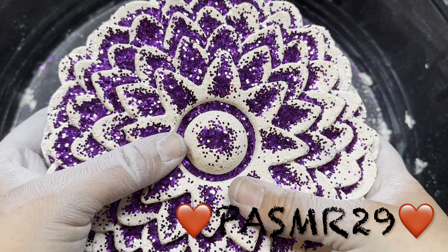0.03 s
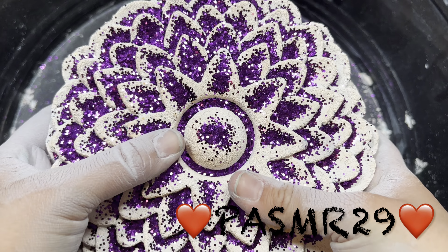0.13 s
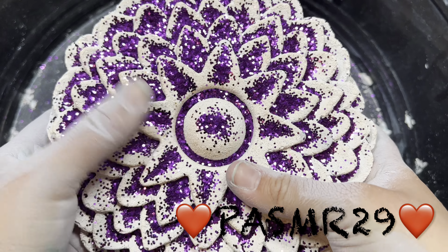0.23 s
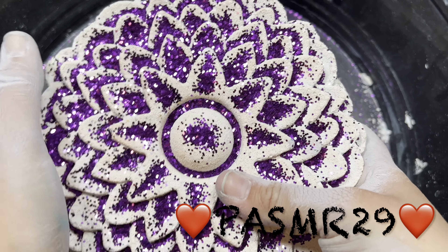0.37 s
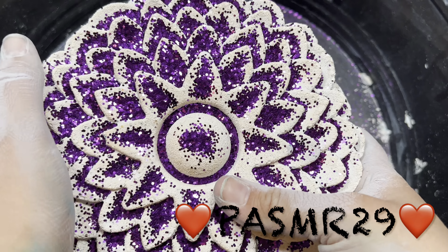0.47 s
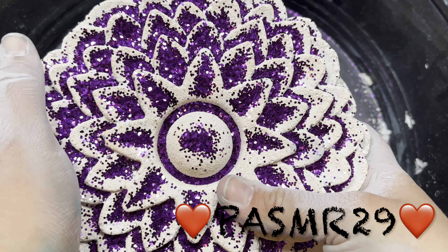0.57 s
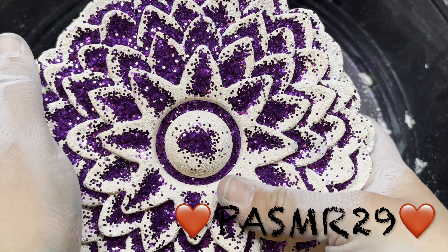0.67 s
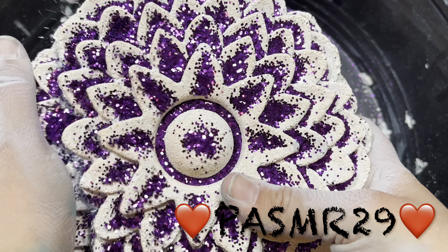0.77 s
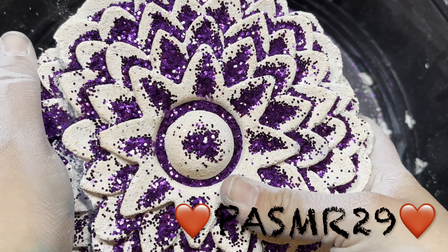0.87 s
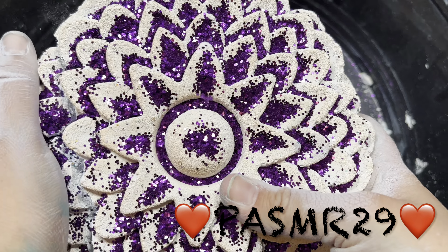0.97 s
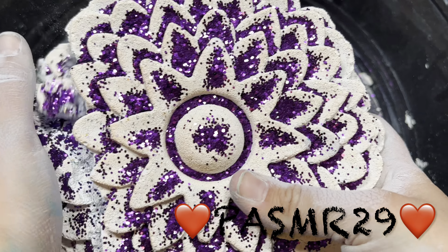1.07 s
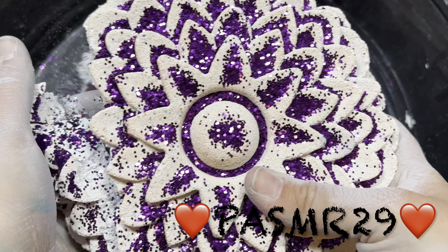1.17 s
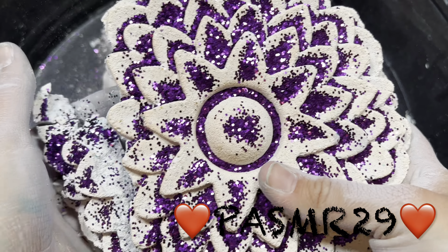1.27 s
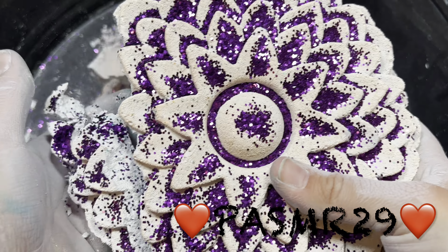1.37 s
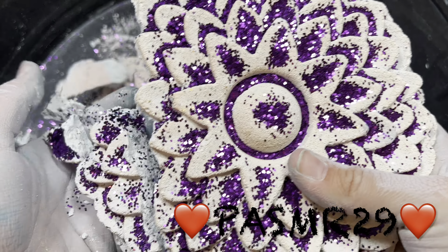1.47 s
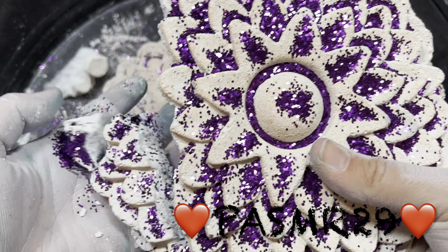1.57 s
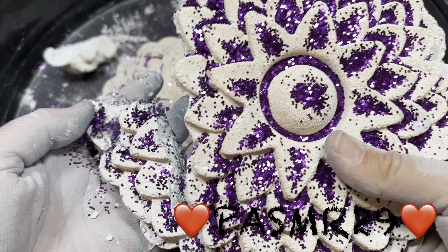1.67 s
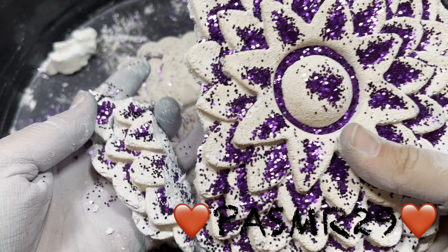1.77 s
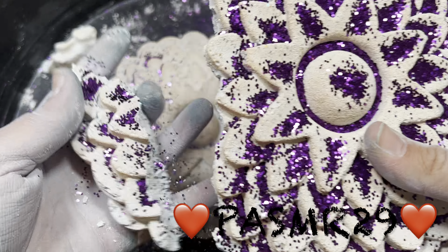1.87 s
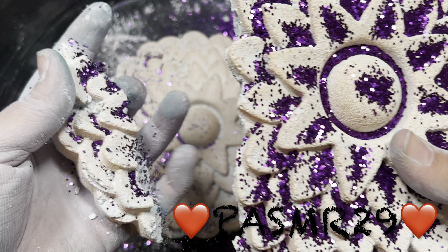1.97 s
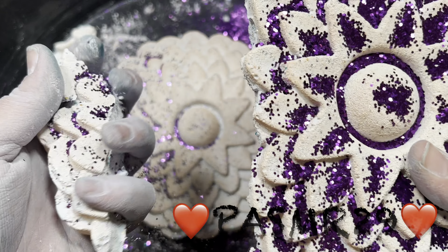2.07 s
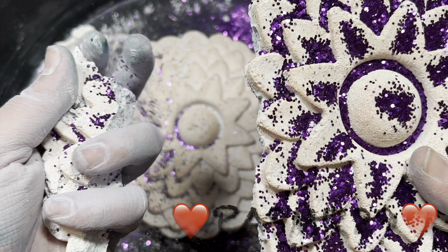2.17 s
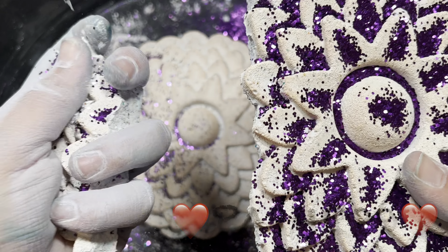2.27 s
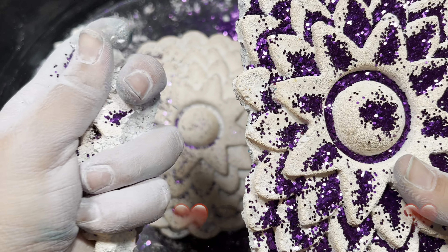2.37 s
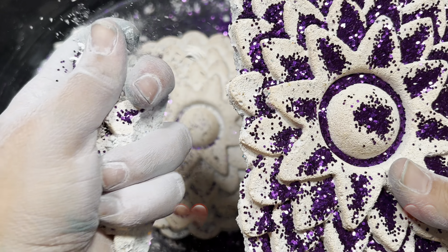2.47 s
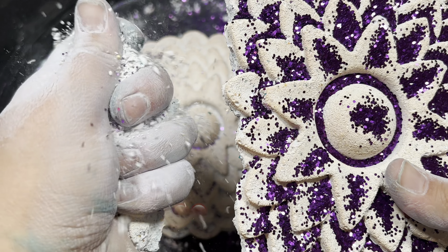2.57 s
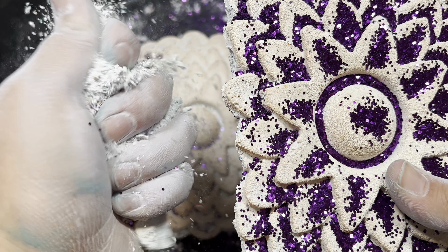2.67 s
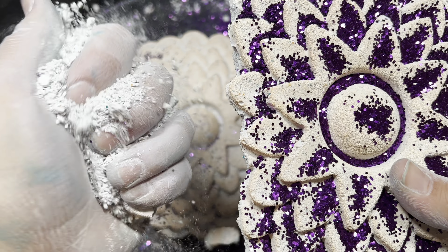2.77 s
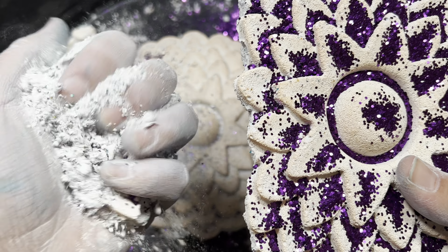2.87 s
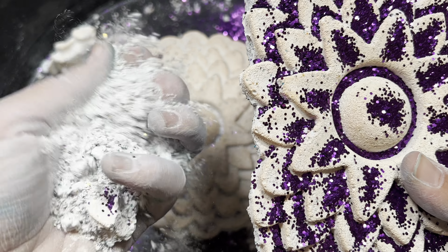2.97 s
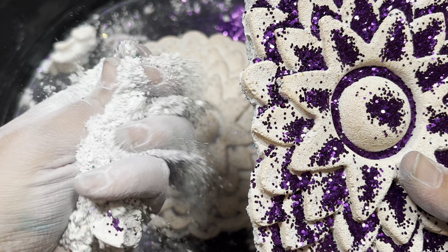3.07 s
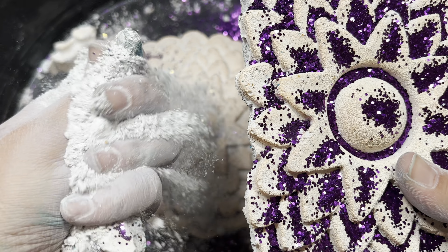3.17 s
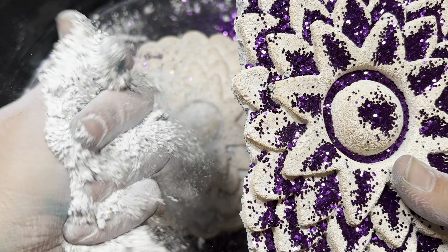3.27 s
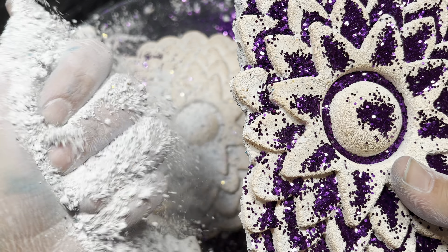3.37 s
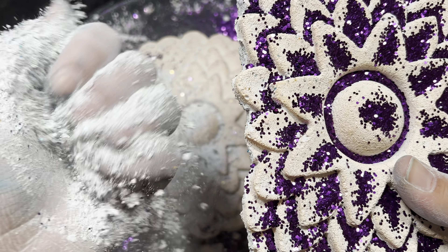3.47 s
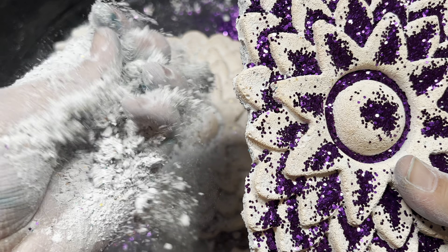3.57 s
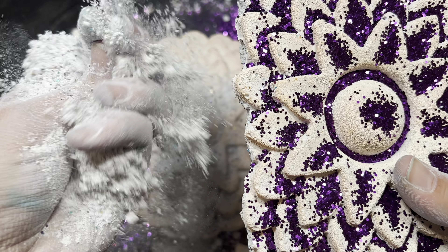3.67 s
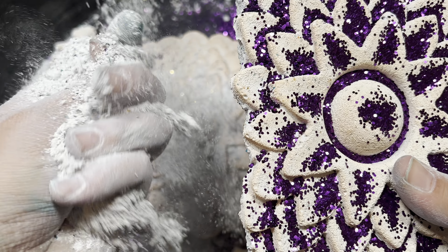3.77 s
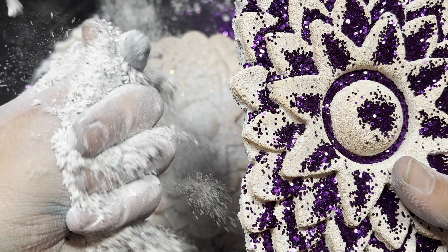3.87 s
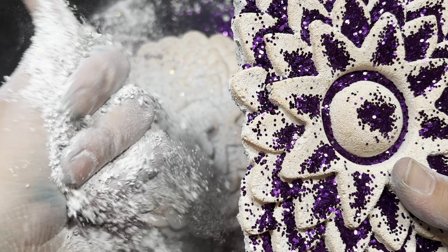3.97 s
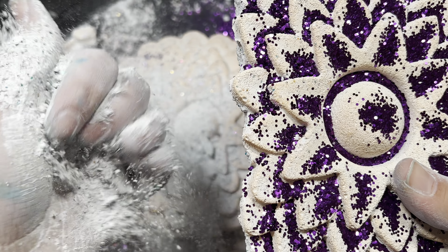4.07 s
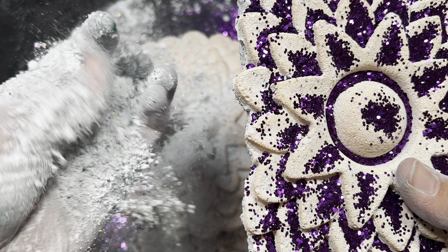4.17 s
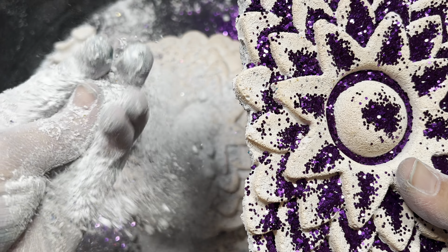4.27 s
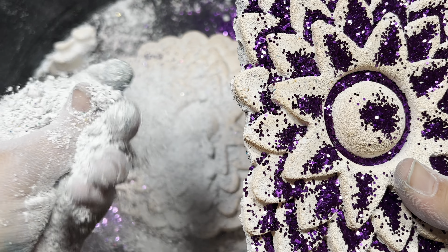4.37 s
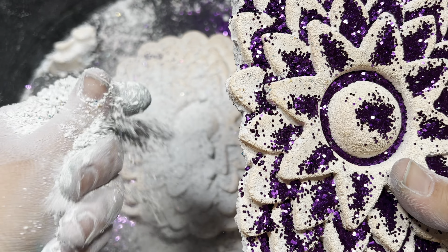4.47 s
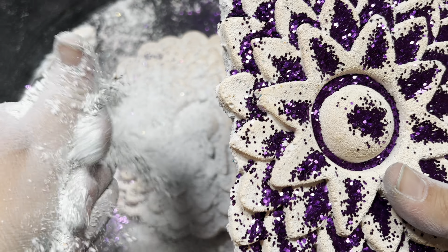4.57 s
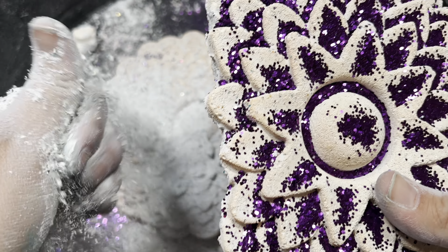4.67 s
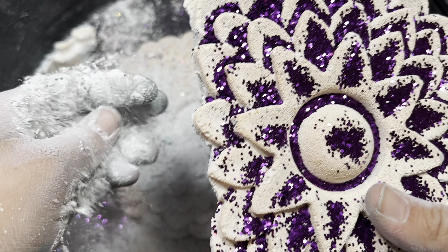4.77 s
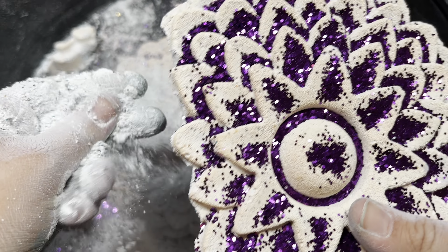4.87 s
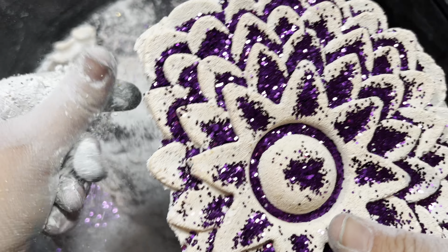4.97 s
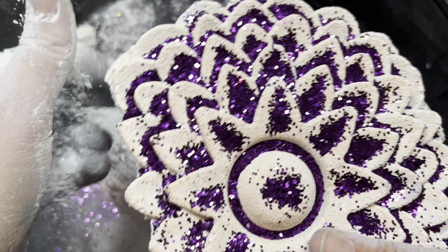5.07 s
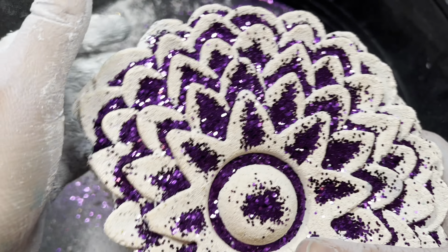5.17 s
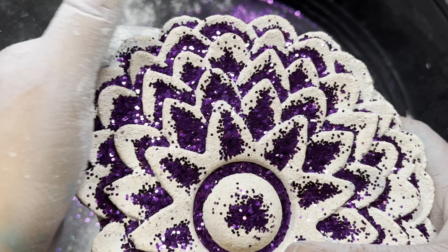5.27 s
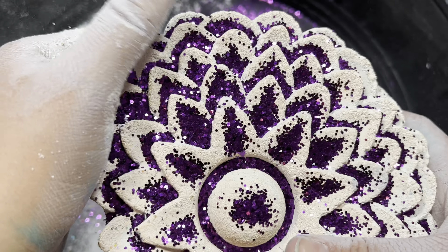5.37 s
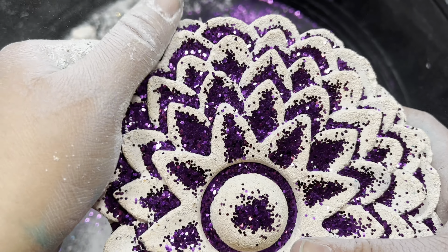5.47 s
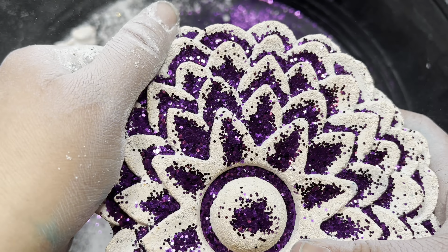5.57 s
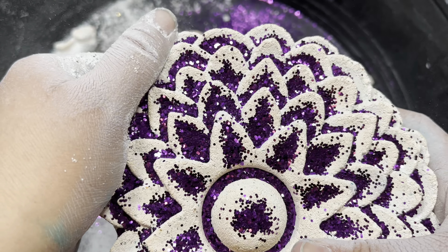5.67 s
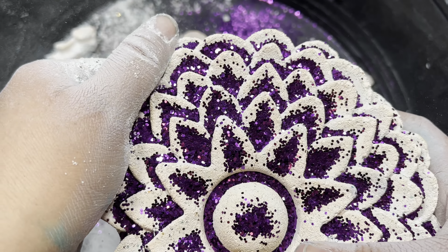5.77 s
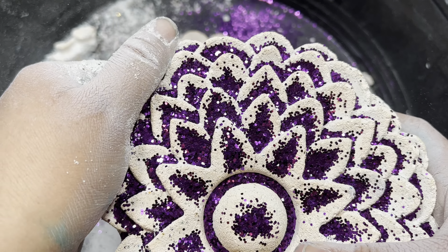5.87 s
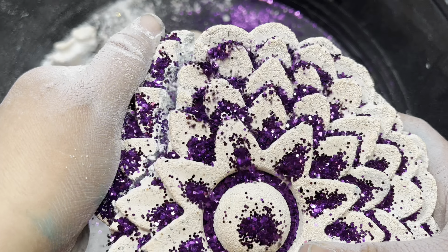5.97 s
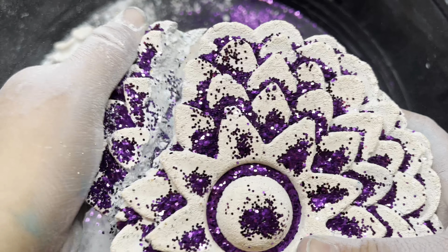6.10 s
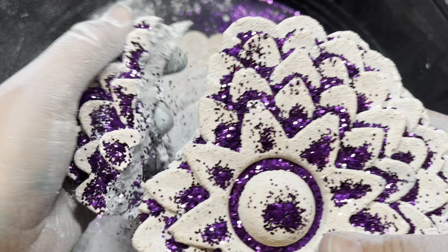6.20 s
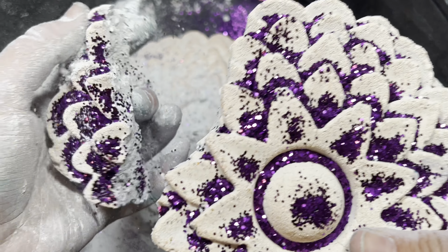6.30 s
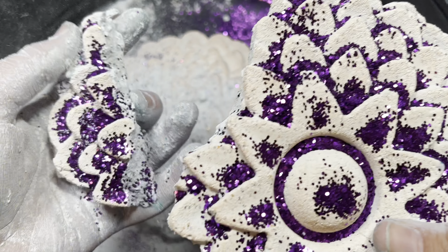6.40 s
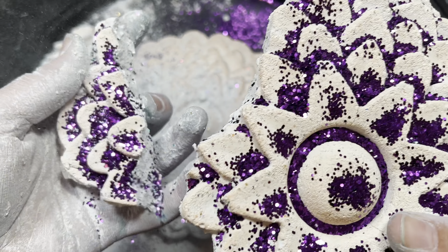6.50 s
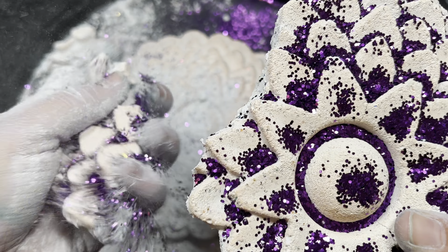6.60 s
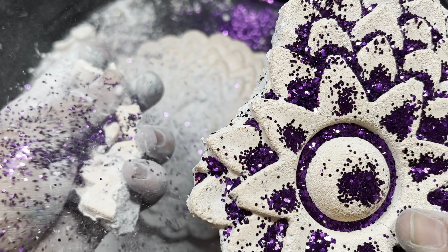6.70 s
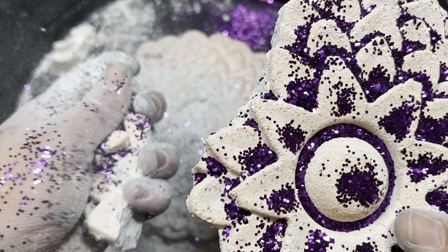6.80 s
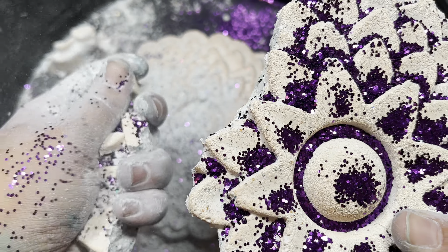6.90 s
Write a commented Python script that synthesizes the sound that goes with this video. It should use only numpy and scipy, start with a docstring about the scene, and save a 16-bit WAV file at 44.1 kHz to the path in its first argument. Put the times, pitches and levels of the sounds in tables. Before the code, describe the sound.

Brittle chalk cracks and crumbles between fingers, hissing powder trickling down and chunks drumming hollowly on a plastic tub.

```python
"""At a plastic tub, stereo phone microphone close in: hands snap pieces off a chalk block and crush them.
Fingers rasp over the chalk, powder rubs and trickles, and the chalk cracks in gritty bursts.
Falling lumps drum on the tub, whose ring shortens as powder fills it; the stand thuds beneath it,
and chips clink on a whole block lying inside. A low hum wavers underneath; the loudest blows clip."""
import sys
import numpy as np
from scipy import signal
from scipy.fft import rfft, irfft, next_fast_len
from scipy.io import wavfile
from scipy.ndimage import uniform_filter1d, map_coordinates

SR = 44100
rng = np.random.default_rng(int(sys.argv[2]) if len(sys.argv) > 2 else 0)


def unload_audio(sound):
    """Save the sound as a 16-bit wav file, at the path given as the first command line argument."""
    columns = np.transpose(np.atleast_2d(sound))
    # keep every value between -1 and 1, then stretch to whole-number steps
    steps = np.round(np.clip(columns, -1, 1) * 32767)
    wavfile.write(sys.argv[1], SR, steps.astype(np.int16))


N = 306054

# spectrum of the background hum: (f/Hz, level/dB)
HUM_SPECTRUM = [(36, -31.5), (49, 4), (70, 4), (86, -8.5), (200, -15), (260, -45.5)]
# fingers sliding over chalk and grinding it: (middle t/s, length/s, level/dB, centre f/Hz)
STROKES = [(0.035, 0.04, -54.5, 2400), (0.22, 0.14, -45.5, 2290), (0.403, 0.24, -48, 2670),
           (0.596, 0.03, -48, 5000), (0.984, 0.1, -41.5, 3030), (1.276, 0.087, -38, 9000),
           (2.049, 0.086, -36, 7000), (2.376, 0.025, -35.5, 6050), (2.631, 0.037, -27.5, 9400),
           (2.937, 0.029, -32, 3100), (3.27, 0.25, -35.5, 7900), (4.138, 0.055, -35, 6560),
           (4.424, 0.05, -38.5, 6000), (4.564, 0.055, -31, 5400), (4.683, 0.063, -38.5, 1500),
           (4.73, 0.063, -32.5, 6860), (4.871, 0.1, -36.5, 2260), (4.941, 0.067, -35, 7500),
           (5.255, 0.071, -35, 6950), (5.432, 0.057, -42.5, 9900), (6.195, 0.34, -48, 5200),
           (6.414, 0.063, -34.5, 6550), (6.554, 0.05, -32, 6070), (6.597, 0.034, -22.5, 6600),
           (6.807, 0.039, -31, 4600)]
# resonances of skin dragged over chalk: (f/Hz, width/Hz, level/dB)
RASP_BANDS = [(2060, 130, 0), (2420, 140, 2.5), (4300, 500, -3), (6000, 380, 3.5)]
# rubbing and trickling powder: (t/s, hiss level/dB, rub level/dB)
POWDER_FLOW = [(.13, -70, -65.5), (.2, -43, -60.5), (.5, -49.5, -61), (.7, -77, -66), (.79, -50.5, -59.5),
               (1.44, -48, -56.5), (1.599, -39, -44.5), (1.901, -40.5, -54.5), (2.459, -43, -56),
               (2.7, -35, -44.5), (3.77, -38, -44.5), (3.851, -33.5, -36), (4.151, -41, -44),
               (4.2, -49, -54.5), (4.279, -42, -46.5), (4.74, -42, -49.5), (4.78, -46, -48.5),
               (4.99, -38, -57.5), (5.061, -55, -56.5), (5.45, -46.5, -57.5), (5.55, -65.5, -71),
               (5.87, -67.5, -66), (5.947, -36.5, -49.5), (6.049, -60.5, -75), (6.501, -46, -56.5),
               (6.94, -40.5, -45)]
# spectra of fine grit and of coarse crumbs rubbing: (f/Hz, level/dB)
GRIT_SPECTRUM = [(1470, -32.5), (2500, -18.5), (2940, -16), (7650, -13), (12200, -18), (15000, -17.5),
                 (16000, -18.5)]
RUB_SPECTRUM = [(260, 8), (450, -17), (535, -23), (724, -4.5), (853, -5), (1680, -11.5), (2000, -6),
                (4000, -16), (6000, -38.5)]
# cracks in the chalk: (t/s, level/dB, centre f/Hz)
SNAPS = [(0.644, -53, 3000), (0.7487, -20, 7950), (0.9162, -36, 2730), (0.931, -27, 2620),
         (0.965, -29.5, 2510), (0.992, -26.5, 3140), (1.1796, -27, 3350), (1.2287, -17, 10900),
         (1.359, -40.5, 3170), (1.487, -36, 8120), (1.504, -20, 6550), (1.608, -29, 7900),
         (1.631, -34, 5100), (2.005, -40, 4460), (2.0256, -23.5, 5370), (2.059, -32.5, 7500),
         (2.211, -32, 6550), (2.223, -27.5, 10900), (2.484, -31, 3080), (2.4972, -20.5, 3360),
         (2.525, -23.5, 5830), (2.578, -33, 2980), (2.671, -27, 8500), (2.734, -31, 6820),
         (2.781, -38, 6000), (2.797, -26.5, 9000), (2.8646, -19, 3580), (2.924, -19.5, 8000),
         (2.949, -43, 7280), (3.066, -25, 7200), (3.144, -29, 5100), (3.181, -21, 10700),
         (3.3257, -17.5, 4900), (3.344, -27, 6000), (3.4495, -16.5, 2500), (3.5462, -25, 11100),
         (4.0092, -22.5, 2440), (4.685, -34, 6000), (4.914, -38.5, 5900), (5.047, -39, 7840),
         (5.094, -44.5, 6850), (5.194, -37, 5800), (5.242, -37, 6060), (5.2977, -36, 2800),
         (5.38, -48, 5000), (5.447, -38, 9980), (5.576, -35.5, 3990), (5.7273, -44, 9920),
         (5.895, -18, 3800), (5.976, -31.5, 11350), (6.123, -43.5, 5430), (6.267, -43, 9940),
         (6.337, -40, 5140), (6.379, -27.5, 3400), (6.478, -47, 6000), (6.646, -30, 7850),
         (6.664, -17, 2640), (6.7417, -23, 2900), (6.818, -18.5, 4520)]
# lumps landing in the tub: (t/s, knock level/dB, knock centre f/Hz, boom level/dB, boom centre f/Hz)
LANDINGS = [(0.754, -15, 1700, -20.5, 357), (0.92, -23.5, 2170, -30.5, 304), (0.99, -23, 1085, -39.5, 371),
            (1.231, -11.5, 1510, -4.5, 200), (1.245, -11.5, 688, -6, 201.7),
            (1.456, -35.5, 647, -23.5, 177.4), (1.508, -9.5, 685, 4.5, 234), (1.565, -25, 742, -2, 187),
            (1.6085, -7.5, 1100, -12.5, 190), (1.696, -9, 707, 1, 335), (1.747, -6, 690, -3.5, 334),
            (1.81, -8, 901, -8, 315), (1.855, -26.5, 724, -16.5, 358), (2.209, -31.5, 1032, -28, 284.5),
            (2.501, -22.5, 915, -22.5, 307), (2.832, -29, 918, -41.5, 300.5), (2.8659, 7.5, 1964, 0, 278.7),
            (2.93, -11.5, 712, -14.5, 197), (2.953, -18, 757, -18, 280.4),
            (2.983, -5.5, 1100, -12.5, 392.6), (3.062, -22, 1197, -20.5, 350),
            (3.071, -13, 1000, -12.5, 402), (3.227, -20, 1610, -36, 361), (3.249, -28, 696, -25, 252.4),
            (3.326, -11, 1382, -21.5, 237), (3.369, -11.5, 1000, -10.5, 312),
            (3.431, -13, 1600, -15, 299.8), (3.452, 3, 900, 5.5, 232.7), (3.475, -29.5, 967, 3.5, 202.5),
            (3.509, -28, 594, -2.5, 277), (3.538, -22, 865, -27, 230.5), (3.574, -19, 900, -13.5, 210.7),
            (3.59, -18, 900, -18.5, 300), (3.649, -23, 1353, -20.5, 200.4), (3.689, -15.5, 1385, -24, 264),
            (3.826, -17, 693, -13.5, 223), (3.896, -23.5, 1288, -26, 207), (3.925, -33, 995, -23, 295.6),
            (3.982, -23, 660, -19, 243), (4.07, -29.5, 691, -25, 204), (4.661, -23, 970, -29.5, 336),
            (5.299, -32.5, 1557, -31.5, 416), (5.578, -35.5, 1810, -38.5, 348.5),
            (5.896, -16, 2110, -14.5, 297), (6.664, -11, 961, -26.5, 355.6), (6.743, -20, 1225, -37, 378),
            (6.821, -18, 2370, -27, 262)]
# low and high modes of the tub: (f/Hz, level/dB, t60/s)
BOOM_MODES = [(195.1, -2.5, 0.29), (234.9, -3.5, 0.2), (290.4, -1, 0.15), (327.8, 2, 0.075),
              (379, -0.5, 0.15)]
KNOCK_MODES = [(703, -2.5, 0.11), (776, 0, 0.051), (993, -3, 0.052), (1111, 1.5, 0.027), (1380, 2.5, 0.024),
               (2064, 1.5, 0.013), (2014, -3.5, 0.05), (2360, -3, 0.05), (3070, -11.5, 0.014)]
# thuds of the stand under the tub: (t/s, level/dB)
STAND_THUDS = [(0.76, -26), (1.245, -11.5), (1.509, -24), (1.736, -25.5), (2.498, -43), (2.864, -20.5),
               (3.453, -11.5), (5.894, -22), (6.605, -33)]
# chips striking the block in the tub: (t/s, level/dB, centre f/Hz)
CHIP_HITS = [(1.247, -16.5, 670), (1.609, -12, 886), (2.027, -27.5, 1520), (2.079, -36, 1350),
             (2.932, -17, 720), (3.575, -20.5, 700), (3.651, -12.5, 1121), (4.036, -29.5, 1360),
             (4.572, -28.5, 1360)]
# modes of that block: (f/Hz, level/dB, t60/s)
BLOCK_MODES = [(692, 3, 0.17), (1300, -0.5, 0.08), (2050, -4, 0.16)]
# stereo width, as gain of the side signal: (f/Hz, level/dB)
SIDE_GAIN = [(60, -18), (200, -12.5), (400, -5), (700, -1), (2400, -7), (8000, -2.5), (15000, 0)]
# response of the microphone: (f/Hz, level/dB)
MIC_RESPONSE = [(20, 3), (1500, 0), (3200, -4.5), (5000, -3.5), (10800, -1), (12000, -4.5), (20000, -6)]

TOP_HZ = 16000
MUFFLE_PER_S = .1  # powder fills the tub and shortens its ring


def undb(db):
    """dB to gain."""
    return 10 ** (np.asarray(db) / 20)


def unit(x):
    """Scaled to rms 1."""
    return x / np.sqrt(np.mean(x ** 2))


def gain_at(table, hz):
    """Gain from a (f/Hz, level/dB) table, interpolated on a log axis."""
    f, db = np.transpose(table)
    return undb(np.interp(np.log(np.maximum(hz, 1)), np.log(f), db))


def colour(x, table, low_hz=0, high_hz=SR):
    """Filter by a (f/Hz, level/dB) table, silent outside it and outside the given band."""
    size = next_fast_len(N)
    hz = np.fft.rfftfreq(size, 1 / SR)
    inside = (hz > max(table[0][0], low_hz)) & (hz < min(table[-1][0], high_hz))
    return irfft(rfft(x, size) * gain_at(table, hz) * inside, size)[..., :N]


def bandpass(x, order, low_hz, high_hz):
    """Butterworth band filter."""
    return signal.sosfilt(signal.butter(order, [low_hz, high_hz], "bandpass", fs=SR, output="sos"), x)


def treble_hump(noise, hz, ratio, broad_db):
    """Broad treble noise with a hump around hz."""
    hump = bandpass(noise, 2, hz / ratio, min(hz * ratio, TOP_HZ))
    broad = bandpass(noise, 1, 1500, min(3 * hz, 11000))
    return unit(hump) + undb(broad_db) * unit(broad)


def wander(per_s):
    """Random values that slide from one to the next."""
    step = int(SR / per_s)
    return uniform_filter1d(np.repeat(rng.standard_normal(N // step + 1), step), step)[:N]


def add(out, s, sound):
    """Mix a sound in at s seconds."""
    i = int(s * SR)
    out[:, i:i + sound.shape[1]] += sound[:, :N - i]


def grains(per_s, spread_db, tail_s):
    """Mid and side of a rain of grains, each a short puff of noise; big ones are rare."""
    hits = rng.random(N) < per_s / SR
    energy = undb(2 * spread_db * np.minimum(rng.exponential(size=N), 4))
    power = signal.lfilter([1], [1, -np.exp(-1 / (tail_s * SR))], hits * energy)
    return np.sqrt(power / power.mean()) * rng.standard_normal((2, N))


def excite(modes, drive):
    """Modes kept ringing by a signal, at that signal's rms."""
    out = 0
    for hz, db, t60 in modes:
        radius = np.exp(-np.log(1000) / (t60 * SR))
        poles = [1, -2 * radius * np.cos(2 * np.pi * hz / SR), radius ** 2]
        out = out + undb(db) * signal.lfilter([1, -1], poles, drive)
    return unit(out) * np.sqrt(np.mean(drive ** 2))


def ring(modes, centre_hz, chance, focus_db, rise_s, muffle,
         detune=0.018, scatter_db=3, side=0.2, damp=0.036):
    """Mid and side of one blow, peak 1: modes near its centre ring most, and chance varies each."""
    t = np.arange(SR // 4) / SR
    hz, db, t60 = np.transpose(modes)[:, :, None]
    level_draw, pitch_draw, phase_draw, side_draw, damp_draw = chance
    gain = undb(db - focus_db * np.log2(hz / centre_hz) ** 2 + scatter_db * level_draw)
    damped_t60 = t60 * np.exp(-muffle - damp * np.abs(damp_draw))
    fade = gain * np.exp(-np.log(1000) * t / damped_t60) * (1 - np.exp(-t / rise_s))
    phase = 2 * np.pi * hz * (1 + detune * pitch_draw) * t + 2 * phase_draw
    mid = np.sum(fade * np.sin(phase), 0)
    shifted = np.sum(fade * np.sin(phase + 2 * side_draw), 0)
    return np.array([mid, side * shifted]) / np.abs(mid).max()


def hum(level_db=-50.5):
    """A bed of narrow low noise whose level wanders."""
    return undb(level_db + 1.2 * wander(5)) * unit(colour(rng.standard_normal((2, N)), HUM_SPECTRUM))


def scrapes(rasp_db=3.5, light_db=-46, focus_db=4.5, pitch_drift=.01):
    """Skin drags jerkily over chalk: light strokes rasp fully, harder ones hiss more."""
    out = np.zeros((2, N))
    grit = grains(1200, 2.6, .003) * undb(2.5 * wander(40))
    playhead = np.clip(np.cumsum(1 + pitch_drift * wander(12)), 0, N - 1)
    bands = []
    for f, width, band_db in RASP_BANDS:
        resonance = signal.lfilter(*signal.iirpeak(f, f / width, fs=SR), grit) / np.sqrt(width)
        drifting = np.array([map_coordinates(x, [playhead], order=1) for x in resonance])
        bands.append((f, undb(band_db + 3.5 * wander(25)) * drifting))
    for s, length_s, db, hz in STROKES:
        t = np.arange(int(2 * length_s * SR)) / SR - length_s
        i = int(max(s - length_s, 0) * SR)
        span = slice(i, i + len(t))
        swell = np.exp(-np.abs(2 * t / length_s) ** np.where(t < 0, 3.5, 1.7))  # quick in, slower out
        rasp = sum(undb(-focus_db * np.log2(f / hz) ** 2) * band[:, span] for f, band in bands)
        hiss = treble_hump(grit[:, span], hz, ratio=1.88, broad_db=0.77)
        stroke = unit(hiss) + undb(rasp_db - max(db - light_db, 0)) * unit(rasp)
        add(out, i / SR, undb(db) * swell * unit(stroke))
    return out


def powder(surges_per_s=25, surge_db=2, clump_db=2.8, ticks_db=-1.5):
    """Fine grit hisses, single grains snap, coarse crumbs rub, and what falls patters on the tub."""
    times, *levels = np.transpose(POWDER_FLOW)
    hiss_db, rub_db = (np.interp(np.arange(N) / SR, times, db) for db in levels)
    coarse, falling = grains(300, 2.4, .005), grains(90, 3.2, .003)
    # each size of grain has its own band and comes in its own clumps
    edges_hz = 1200 * 1.55 ** np.arange(7)
    fine = 0
    for low, high in zip(edges_hz, edges_hz[1:]):
        clumps = undb(clump_db * wander(surges_per_s / 2))
        fine += clumps * colour(grains(220, 2.7, .003) + .7 * coarse, GRIT_SPECTRUM, low, high)
    ticks = sum(colour(grains(24, 2, .004), GRIT_SPECTRUM, low, high)
                for low, high in zip(edges_hz, edges_hz[2:]))
    grit = unit(fine) + undb(ticks_db) * unit(ticks)
    hiss = undb(hiss_db + surge_db * wander(surges_per_s)) * unit(grit)
    rub = undb(rub_db) * unit(colour(coarse, RUB_SPECTRUM))
    murmur = undb(-1.5) * excite(BOOM_MODES, undb(rub_db) * falling)
    patter = undb(-4) * excite(KNOCK_MODES, undb(rub_db) * falling[::-1])
    return hiss + rub + murmur + patter


def cracks(rise_s=0.0006, t60_s=0.025, tail_s=0.024):
    """Chalk snaps in a gritty burst with duller splinters in its tail."""
    out = np.zeros((2, N))
    t = np.arange(SR // 5) / SR
    grit = grains(1500, 2.4, .001)
    rise = 1 - np.exp(-t / rise_s)
    burst = rise * np.exp(-np.log(1000) * t / t60_s)
    tail = rise * np.exp(-t / tail_s)
    for s, db, hz in SNAPS:
        i = min(int(s * SR), N - len(t))
        noise = treble_hump(grit[:, i:i + len(t)], hz, ratio=2.07, broad_db=-0.3)
        splinters = signal.sosfilt(signal.butter(2, min(1.52 * hz, TOP_HZ), fs=SR, output="sos"), noise)
        shed = undb(-12.5 + 0.5 * (db + 23.5))  # bigger cracks shed more splinters
        add(out, s, undb(db) * (burst * noise + shed * tail * splinters))
    return out


def break_up(knock, within_s=0.011, pieces_db=-7):
    """A lump breaks as it lands, and three pieces knock again."""
    hits = np.zeros(int(within_s * SR))
    hits[rng.integers(len(hits), size=3)] = undb(pieces_db) * rng.standard_normal(size=3)
    hits[0] = 1
    return signal.lfilter(hits, 1, knock)


def lumps(debris_db=-1, crumbs_db=2.5, soft_under_db=-19):
    """Lumps boom and knock on the tub with a dull splash of crumbs; where one lands picks the modes."""
    out = np.zeros((2, N))
    t = np.arange(SR // 4) / SR
    n_boom = len(BOOM_MODES)
    chances = rng.standard_normal((len(LANDINGS), 5, n_boom + len(KNOCK_MODES), 1))
    crumble = grains(1600, 2, .002)
    splash = np.exp(-t / 0.00079) + undb(-13) * np.exp(-t / 0.028)
    for (s, knock_db, knock_hz, boom_db, boom_hz), chance in zip(LANDINGS, chances):
        filling = MUFFLE_PER_S * s
        softness = .05 * max(soft_under_db - knock_db, 0)  # small lumps land softly and ring less
        boom = ring(BOOM_MODES, boom_hz, chance[:, :n_boom], focus_db=15, rise_s=0.0015,
                    muffle=filling / 2, detune=0.027)
        knock = ring(KNOCK_MODES, knock_hz, chance[:, n_boom:], focus_db=11, rise_s=0.0004,
                     muffle=filling + softness, side=0.19, damp=0.36)
        i = int(s * SR / 2)
        crumbs = bandpass(crumble[:, i:i + len(t)], 3, 500, 1800 + 1.2 * knock_hz) * splash
        add(out, s, undb(knock_db) * (break_up(knock) + undb(crumbs_db) * crumbs))
        # scattering debris keeps the boom rough
        debris = bandpass(rng.standard_normal((2, len(t))), 2, 170, 480) * np.exp(-t / 0.04)
        add(out, s, undb(boom_db) * (boom + undb(debris_db) * debris))
    return out


def thuds(hz=76):
    """The stand under the tub gives a low, quickly damped thud."""
    out = np.zeros((2, N))
    t = np.arange(SR // 4) / SR
    thud = np.sin(2 * np.pi * hz * t) * (t / 0.011) * np.exp(1 - t / 0.0092)
    for s, db in STAND_THUDS:
        add(out, s, undb(db) * thud[None])
    return out


def clinks():
    """Chips strike the block in the tub, which rings short and clear."""
    out = np.zeros((2, N))
    chances = rng.standard_normal((len(CHIP_HITS), 5, len(BLOCK_MODES), 1))
    for (s, db, hz), chance in zip(CHIP_HITS, chances):
        clink = ring(BLOCK_MODES, hz, chance, focus_db=21, rise_s=0.00083,
                     muffle=MUFFLE_PER_S * s, detune=0.013, scatter_db=5, side=0.48)
        add(out, s, undb(db) * clink)
    return out


def stereo(mid, side, treble_share=0.32, shift_hz=5000):
    """The microphone's two ports agree in the bass; in the treble the right one leads in phase."""
    hz = np.fft.rfftfreq(N, 1 / SR)
    share = treble_share / (1 + (shift_hz / (hz + 1)) ** 4)
    spectrum = np.sqrt(1 - share) * rfft(side) - np.sqrt(share) * 1j * rfft(mid)
    side = irfft(spectrum * gain_at(SIDE_GAIN, hz), N)
    return np.array([mid + side, mid - side])


def scene():
    """All sources at the tub, summed as mid and side and turned to left and right."""
    mid, side = lumps() + thuds() + clinks() + cracks() + scrapes() + powder() + hum()
    return stereo(mid, side)


def record(dry):
    """The close microphone colours the sound, the input clips flat at full scale and the top is cut."""
    clipped = np.clip(colour(dry, MIC_RESPONSE), -.995, .995)
    return signal.sosfilt(signal.ellip(10, .05, 60, TOP_HZ, fs=SR, output="sos"), clipped)


dry = scene()
out = record(dry)
unload_audio(out)
```